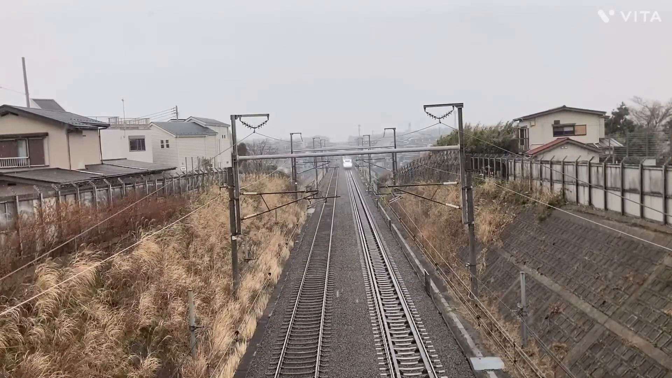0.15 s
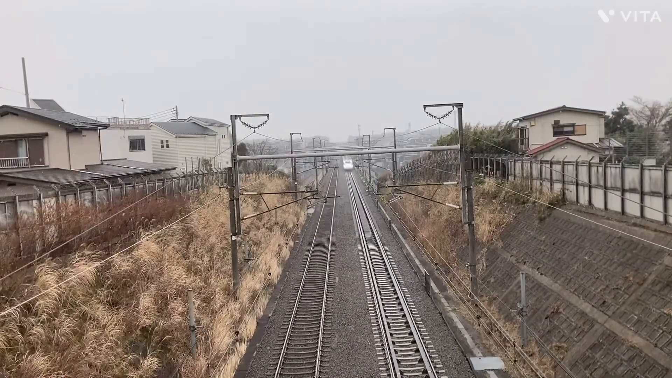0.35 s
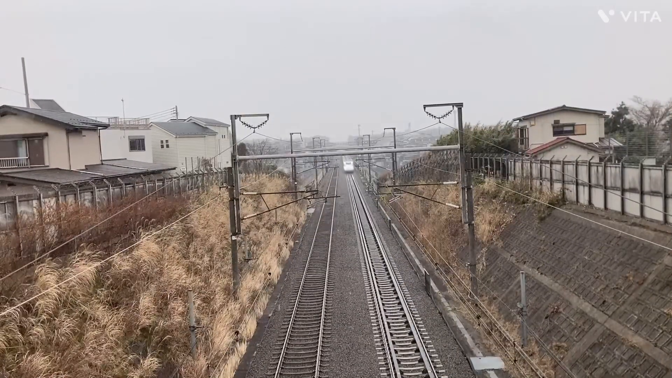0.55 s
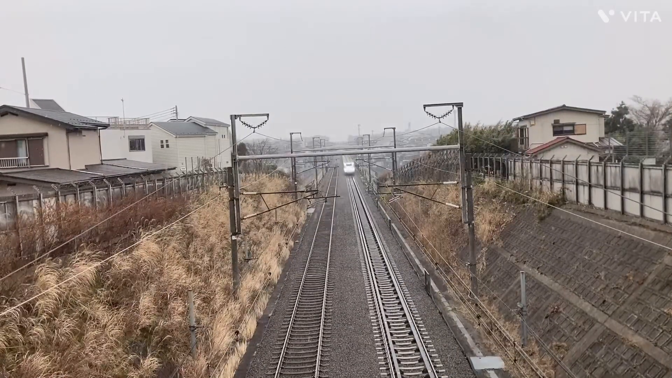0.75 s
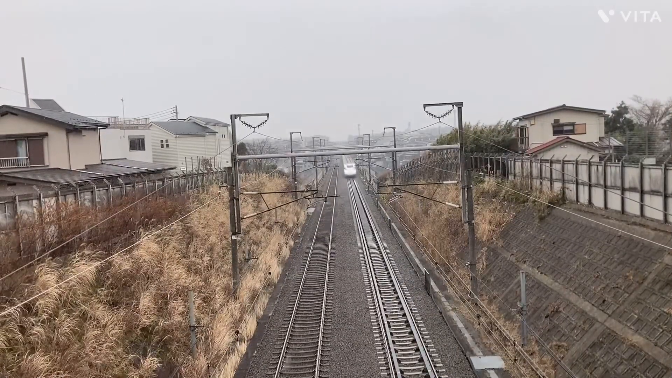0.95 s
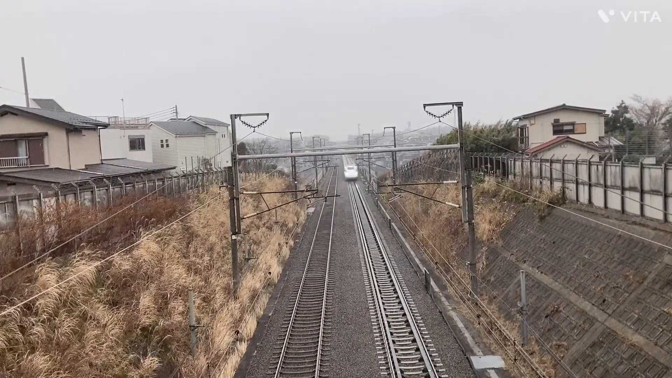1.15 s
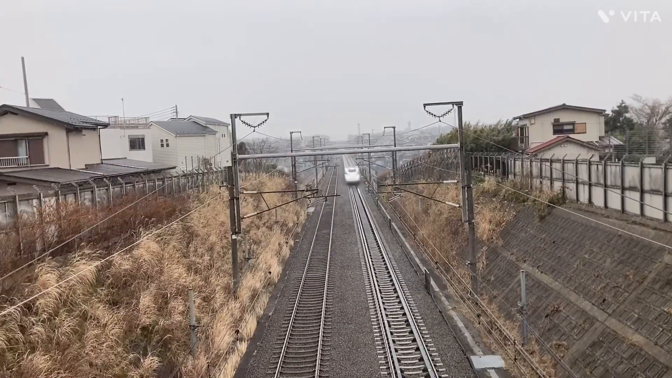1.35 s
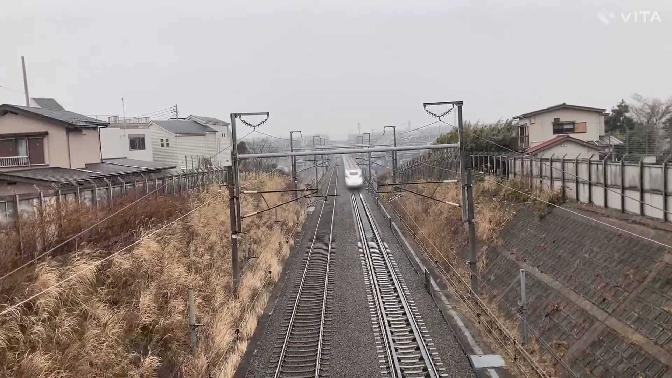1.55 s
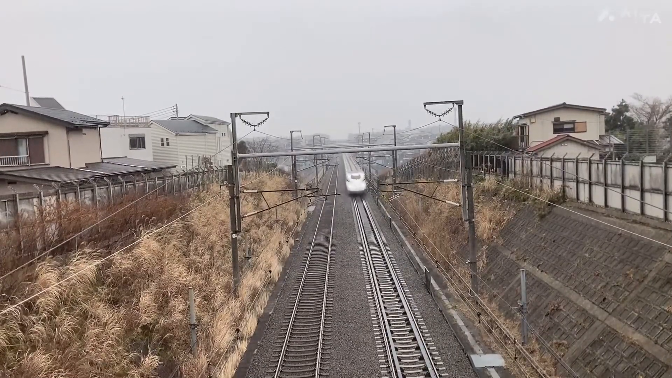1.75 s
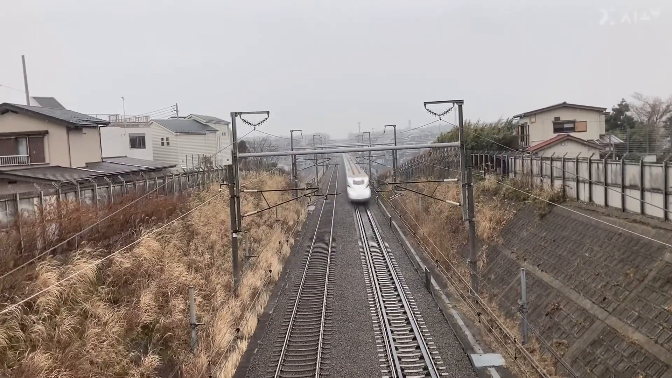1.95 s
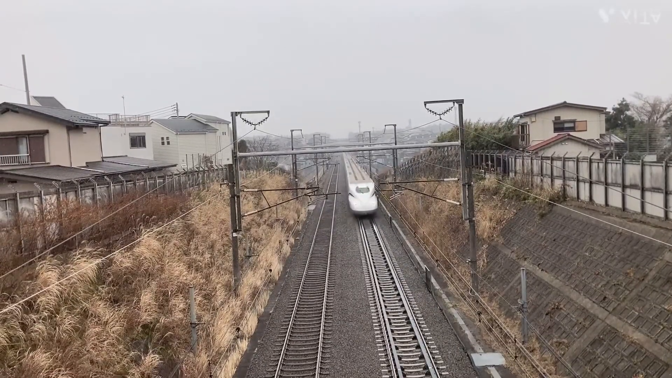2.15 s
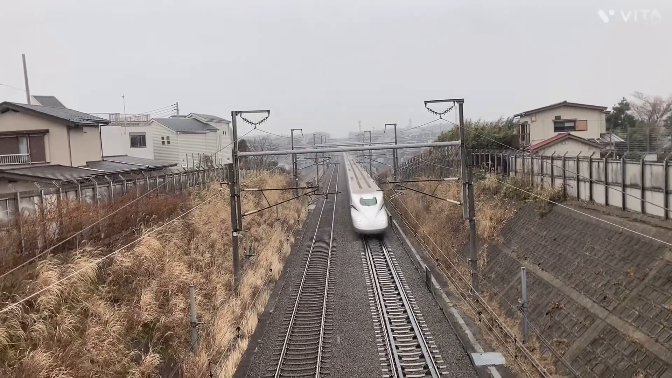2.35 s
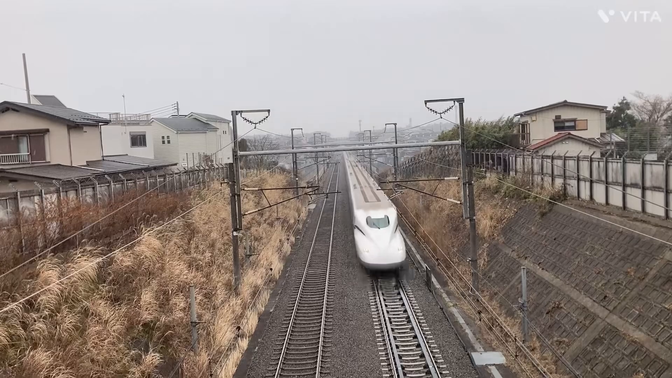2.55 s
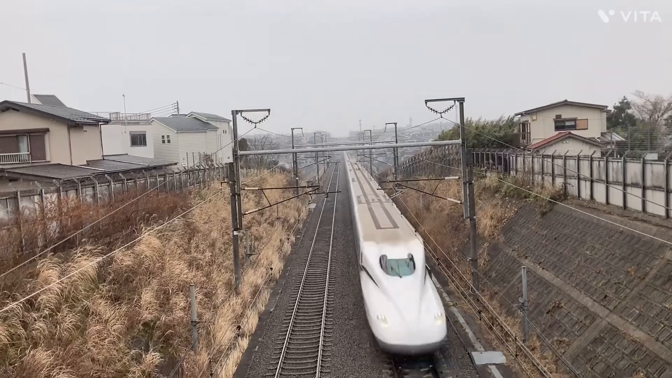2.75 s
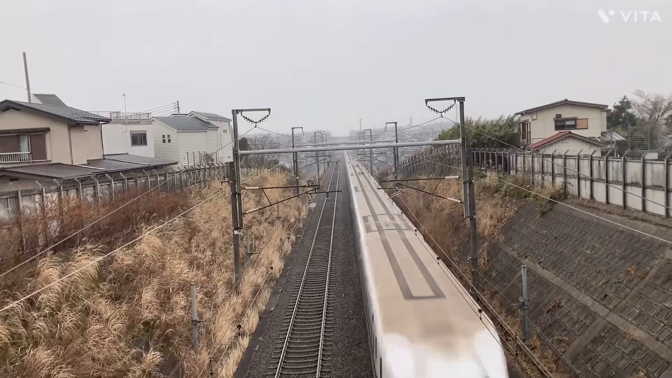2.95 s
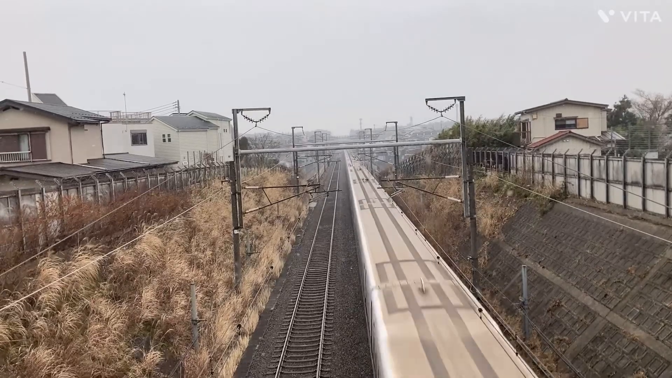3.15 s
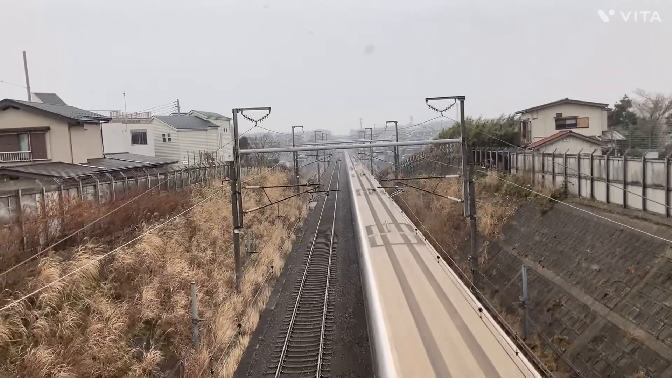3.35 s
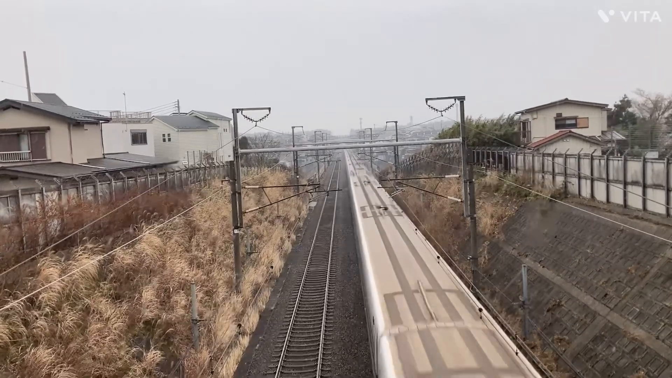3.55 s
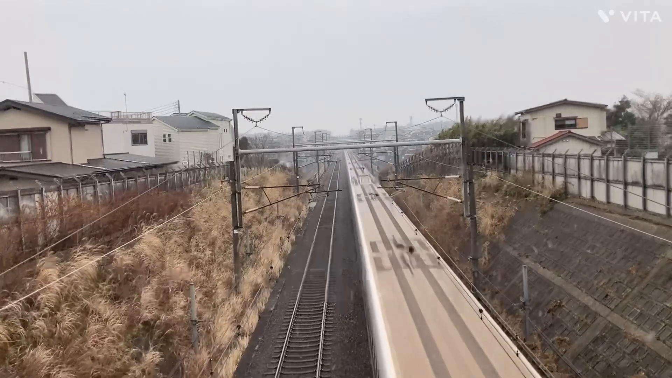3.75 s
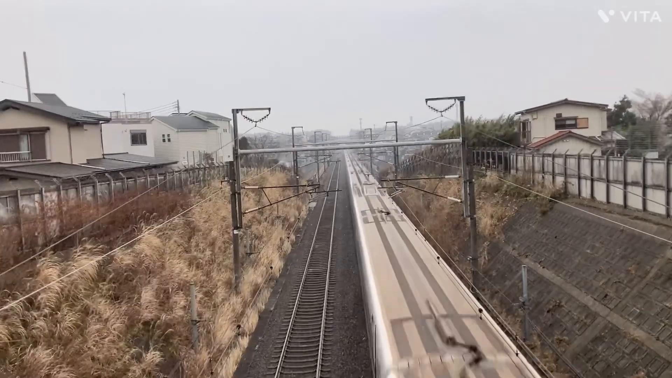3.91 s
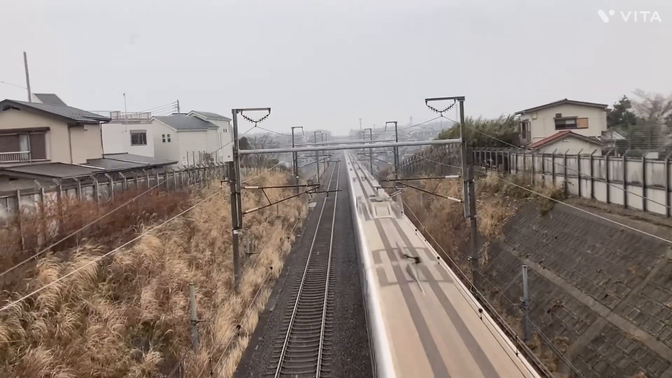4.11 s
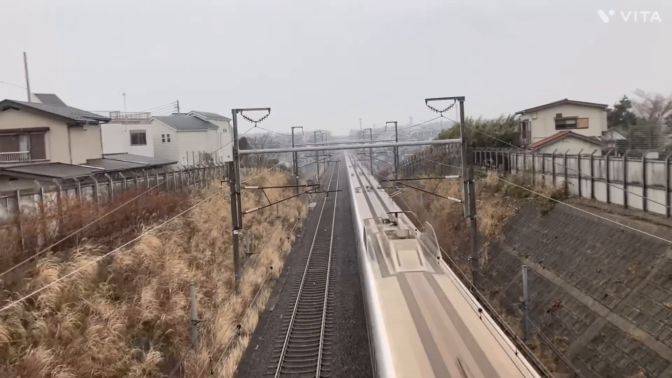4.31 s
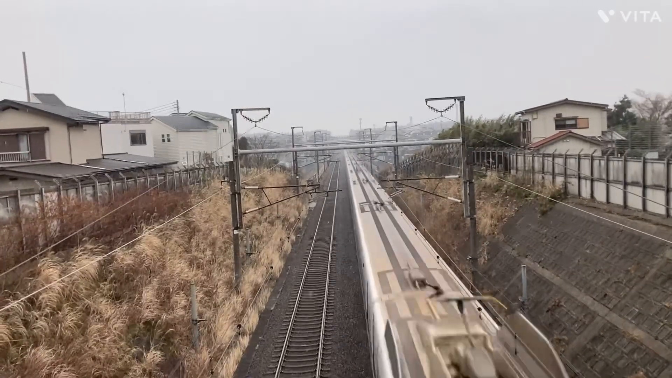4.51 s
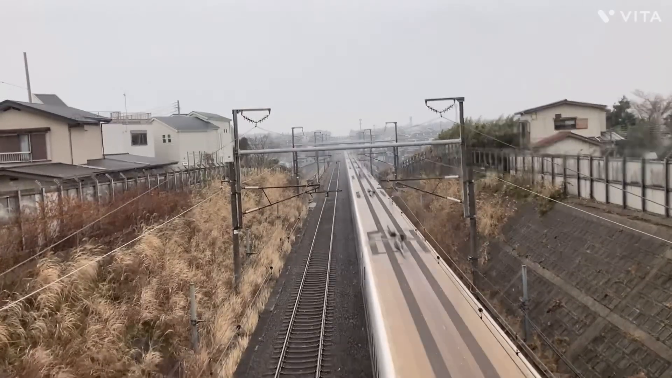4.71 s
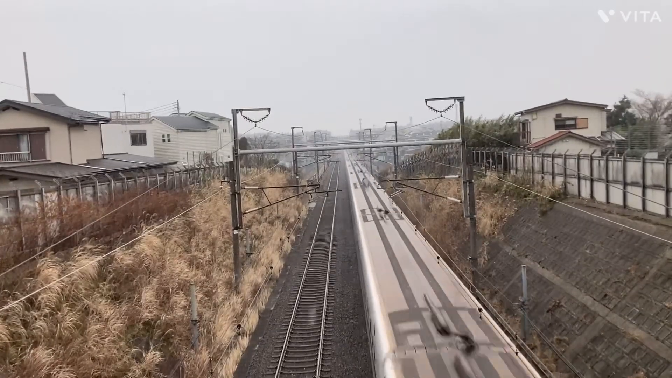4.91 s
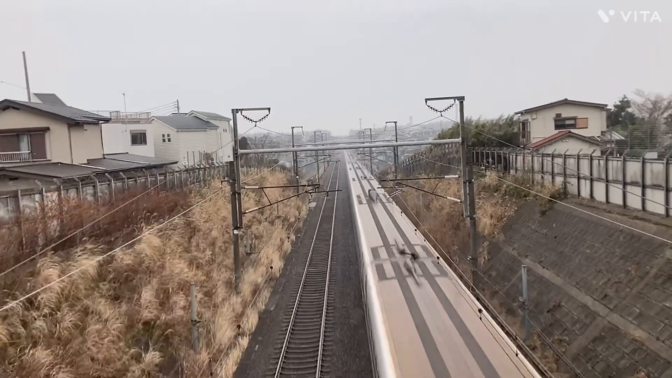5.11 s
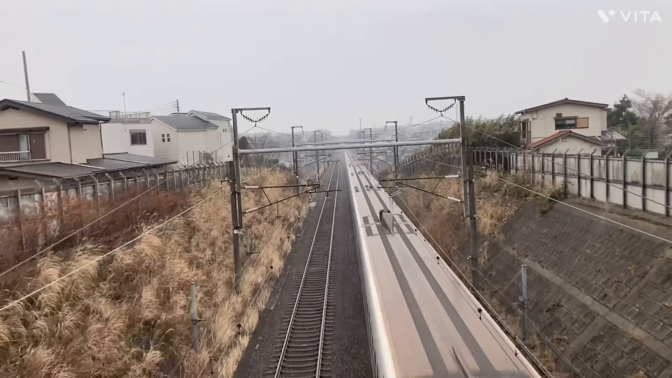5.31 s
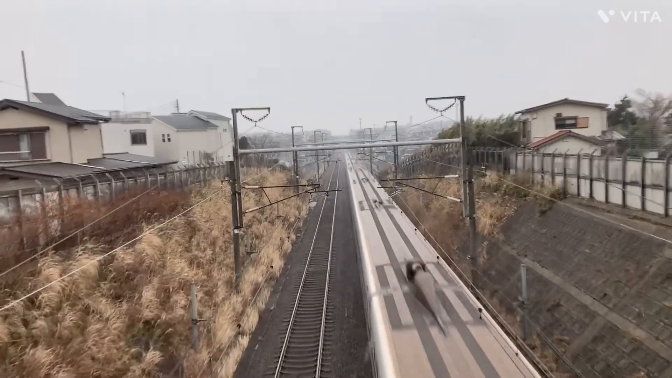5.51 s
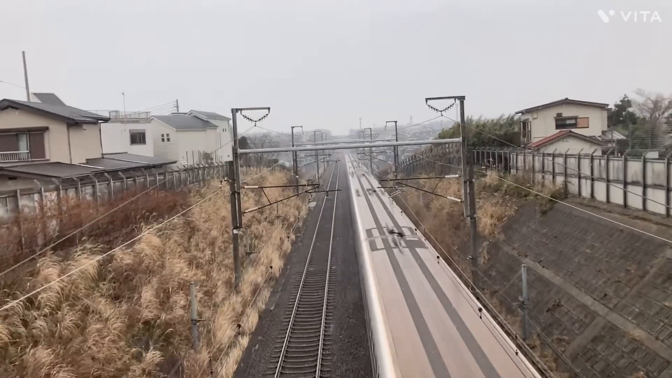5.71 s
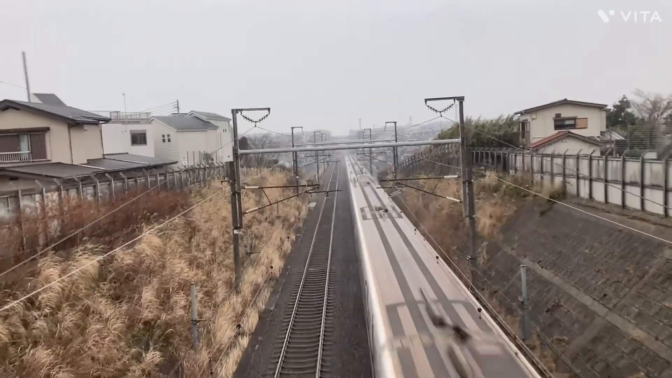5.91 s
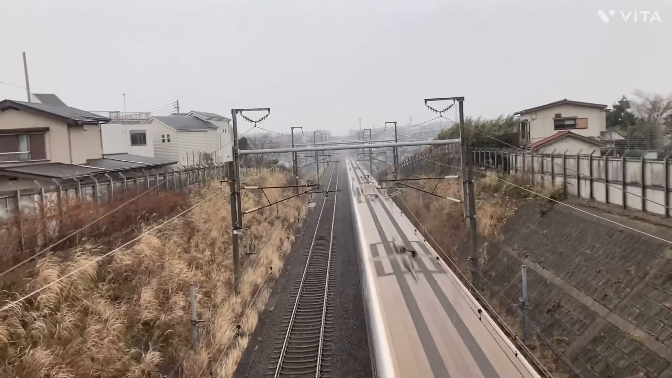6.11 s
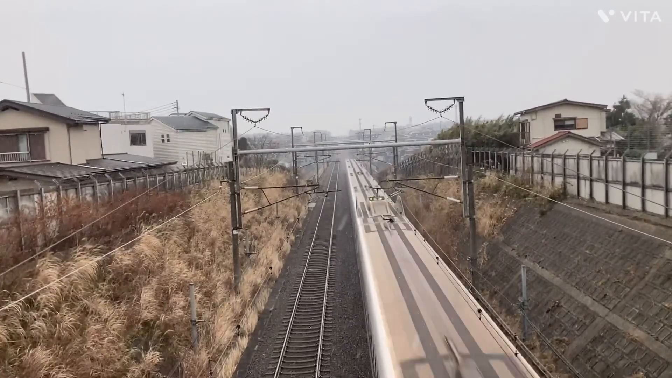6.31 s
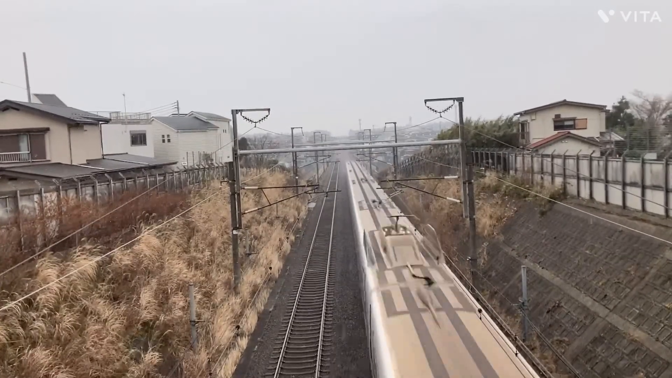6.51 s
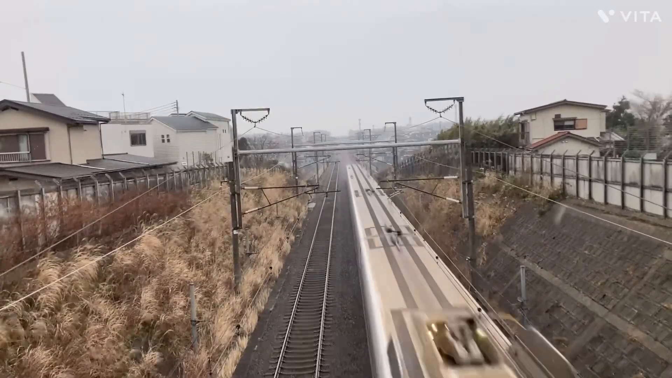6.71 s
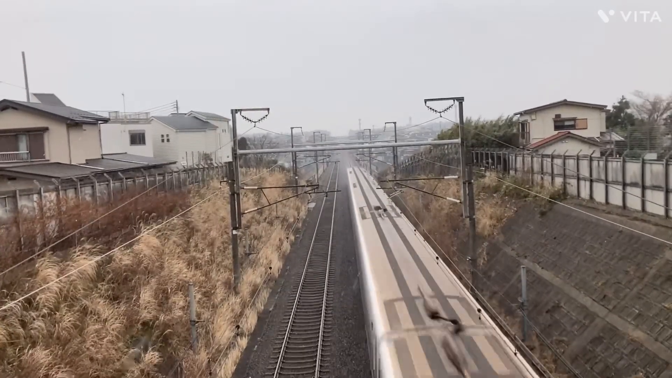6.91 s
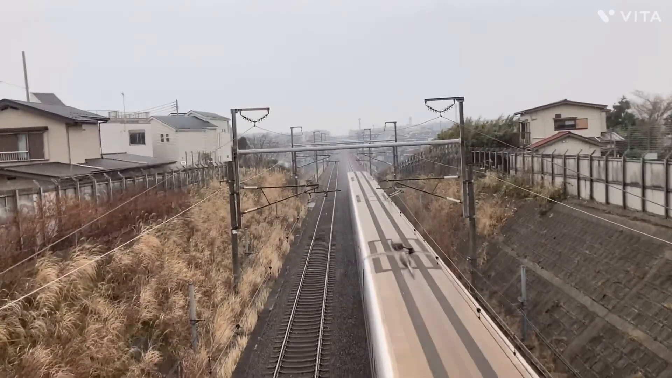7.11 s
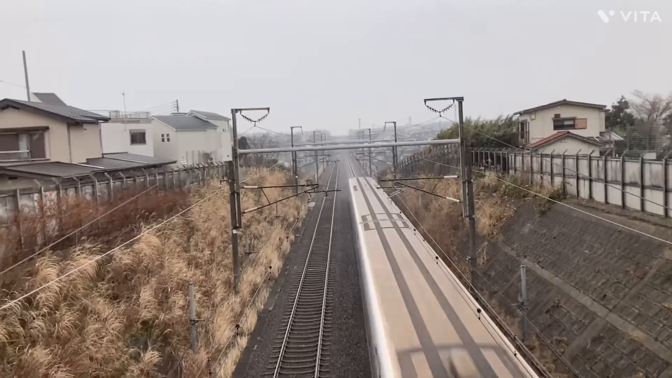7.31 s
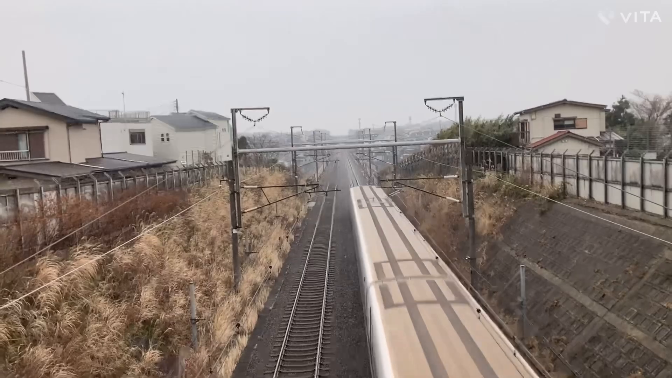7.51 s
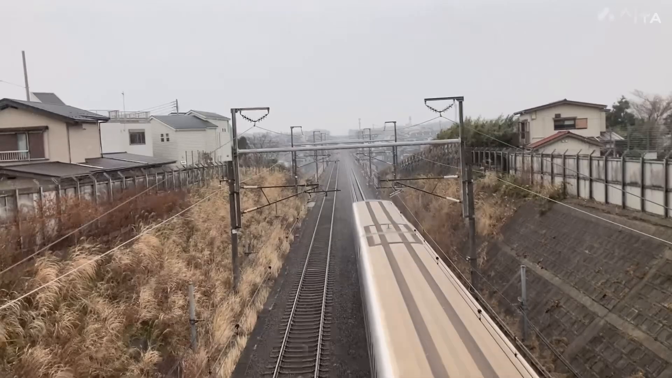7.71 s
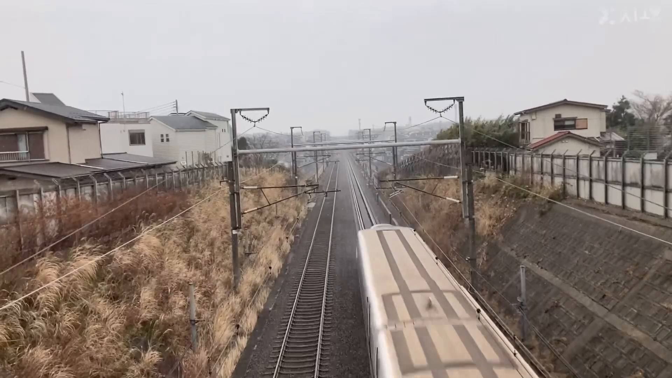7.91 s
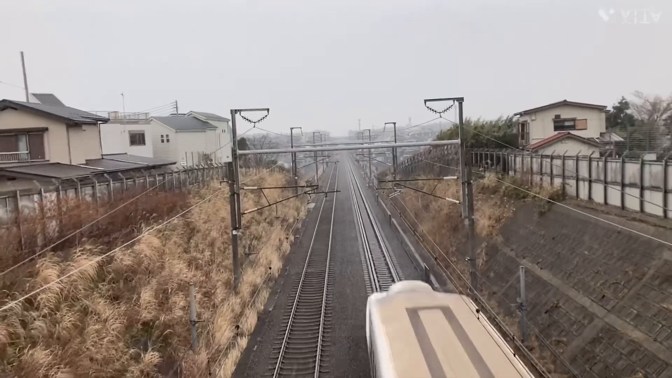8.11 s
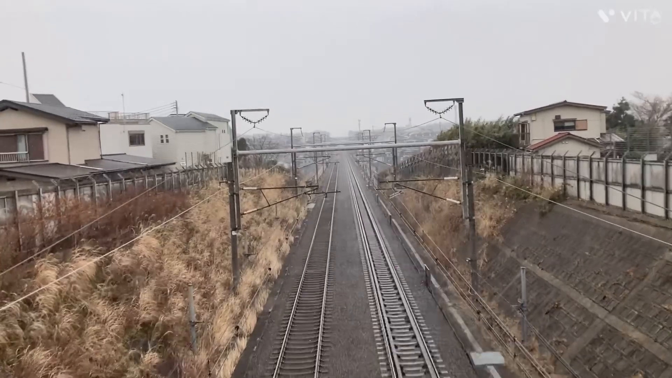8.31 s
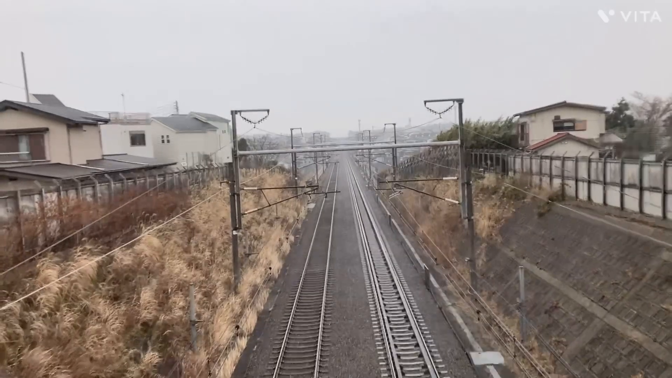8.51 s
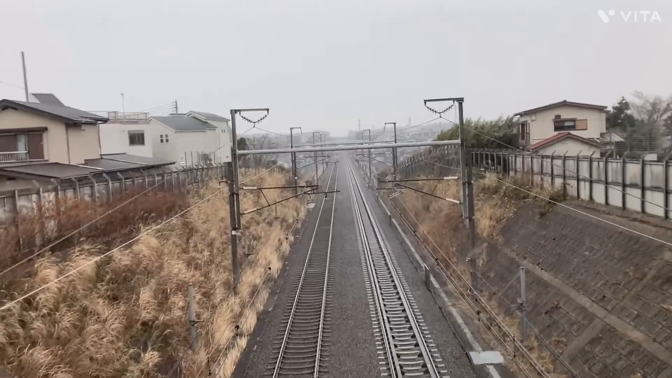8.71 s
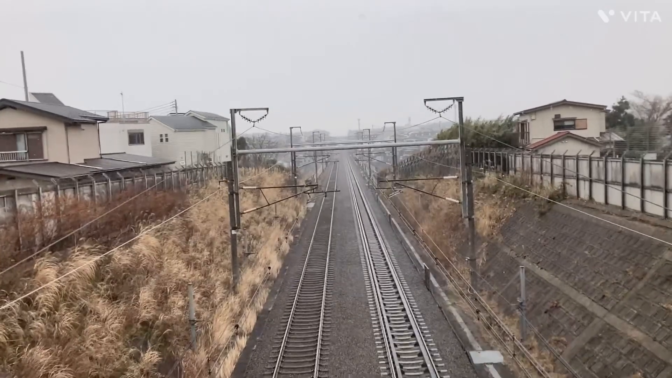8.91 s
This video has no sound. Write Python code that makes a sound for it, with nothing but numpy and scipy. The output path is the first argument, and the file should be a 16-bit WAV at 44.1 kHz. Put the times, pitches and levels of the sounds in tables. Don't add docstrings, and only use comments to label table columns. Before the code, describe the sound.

A high-speed train approaches with ringing wires and growing rumble, roars beneath a bridge in pulsing rushes of air, then cuts away into buffeting wind.

```python
import sys
import numpy as np
from scipy import signal
from scipy.fft import rfft, irfft, next_fast_len
from scipy.io import wavfile
from scipy.ndimage import uniform_filter1d

SR = 44100
rng = np.random.default_rng(int(sys.argv[2]) if len(sys.argv) > 2 else 0)


def output_pcm(signal):
    pcm = np.clip(np.atleast_2d(signal).T, -1, 1) * 32767
    wavfile.write(sys.argv[1], SR, np.round(pcm).astype(np.int16))


def attenuation_scalar(level_db):
    decades = np.asarray(level_db, float) / 20
    return 10 ** decades


N = 394694
SIZE = next_fast_len(N)
HZ = np.maximum(np.arange(SIZE // 2 + 1) * SR / SIZE, 1)
TAIL_S = 8.57

# f/Hz, density/dB per Hz
FAR_RUMBLE_DB = [(18, -35), (30, -14), (45, -1), (62, 2), (85, -5), (150, -11), (230, -14), (300, -18.5),
                 (420, -28), (550, -41)]
NEAR_RUMBLE_DB = [(18, -45), (30, -24), (40, -8.5), (52, -2.5), (74, 0.5), (110, -3.5), (200, -5.5),
                  (300, -13), (420, -24), (550, -31.5)]
FAR_ROLLING_DB = [(200, -44), (300, -4), (420, -2.5), (560, -1.5), (800, -0.5), (1000, -3), (1200, -9.5),
                  (1500, -45)]
NEAR_ROLLING_DB = [(200, -18), (300, -3), (450, -4), (650, -2), (900, -5), (1200, -10), (1500, -19)]
FAR_WHEELS_DB = [(950, -57), (1250, -9), (1500, -1), (1700, -1), (1900, -5), (2150, -10.5), (2600, -8),
                 (3300, -19)]
NEAR_WHEELS_DB = [(950, -18), (1200, -3.5), (1500, -0.5), (1900, 0.5), (2200, -3.5), (2600, -8),
                  (3300, -31.5)]
FAR_RUSH_DB = [(2100, -32), (2600, -2.5), (3300, -1), (3800, -6), (4400, -6), (5500, -12.5), (8000, -16),
               (15800, -20)]
NEAR_RUSH_DB = [(2100, -37), (2600, -1.5), (3600, -1), (5000, -6.5), (7000, -6.5), (10000, -2.5),
                (13000, -9), (15800, -5)]
# t/s, level at 15 kHz and above/dB
AIR_DULLING_DB = [(0, -9), (.8, -10), (1.5, 0.5), (8.4, 0), (8.95, -17)]
# t/s, nearness/0-1
ARRIVAL = [(2.2, 0.02), (2.902, 1)]
# t/s, nearness through air/dB, extra shaking through ground and bridge/dB
NEARNESS_DB = [(0, -28, 5), (.3, -28.5, 8), (.86, -21, -0.5), (1.13, -16, -7), (1.6, -11, -9),
               (1.85, -11.5, -2.5), (2.4, -7, 0.5), (2.85, 2.5, -2.5), (3.25, 2, 0.1), (3.6, -0.3, 2.5),
               (3.9, -1, 2), (4.3, -0.15, -0.7), (4.9, -4, 1), (5.9, -6, 3.5), (6.6, -3.5, -1),
               (7.25, -5, 2.5), (8.0, -7, 4), (8.5, -6, 3.5)]
# t/s, hiss swell/dB, thud swell/dB, half length/s
CAR_GAPS = [(3.063, 5.5, 1, 0.096), (3.39, 4, -1, 0.065), (3.732, 6, -0.5, 0.076), (4.07, 6, 1.5, 0.083),
            (4.409, 4, 3, 0.066), (5.07, 5.5, 3, 0.076), (5.415, 5.5, 3, 0.088), (5.73, 4, 1.5, 0.084),
            (6.077, 7.5, 3, 0.084), (6.42, 4.5, 4, 0.084), (6.575, 4, -0.5, 0.017),
            (7.089, 6.5, 3.5, 0.083), (7.429, 7, 5.5, 0.087), (7.76, 5, 0.5, 0.11), (8.106, 5, 2, 0.095),
            (8.506, 0.5, 1, 0.087)]
# t/s, hiss swell/dB, thud swell/dB, rise/s, fall/s
COLLECTORS = [
    (4.68, 11, 8, 0.24, 0.08),
    (5.805, 4, 7.5, 0.046, .02),
    (6.888, 10.5, 11.5, 0.2, .045),
]
# t/s, level/dB
END_CARS_DB = [(7.5, 0), (7.65, -2.2), (8.4, -2.5), (8.5, 0)]
# level/dB, shares [dB per dB] of nearness, shaking, hiss swell, thud swell, fade past tail/dB per s
RUMBLE_LAW = (-13, 1.07, 0.72, 0.01, 0.8, 11)
ROLLING_LAW = (-24.5, 1.07, 0.14, .5, 0.8, 21)
WHEEL_LAW = (-28.5, 0.7853, -0.14, 1.17, -0.12, 26)
RUSH_LAW = (-30.5, 1.09, 0.05, 1.02, 0.13, 9)
RAIL_LAW = (-31, 0.47, 0.37, 0.7, -0.54, 36)

# f/Hz, width/Hz, level/dB
RAIL_MODES = [(1803, 36, .6), (1647, 54, -6.5), (2030, 450, -1)]
# t/s, level/dB
RAIL_SONG_DB = [(1.6, -26), (2.7, -1), (3.1, -0.5), (4.1, -1), (4.8, -3), (6.6, -0.5), (7.8, -2.5),
                (8.3, -0.5), (8.62, -4), (8.75, -16)]
# t/s, f/Hz, width/Hz, length/s, level/dB
HOWLS = [(5.715, 1330, 520, 0.04, -20.5), (6.06, 3100, 1300, 0.036, -27), (4.66, 1300, 360, 0.065, -24),
         (6.86, 1450, 300, 0.046, -22), (5.39, 2900, 1600, 0.06, -29), (7.41, 3000, 1600, .06, -31),
         (4.05, 2800, 1600, .05, -28), (3.07, 2000, 600, 0.05, -24), (6.76, 7000, 2500, .1, -33),
         (3.02, 264, 95, 0.16, -19), (6.88, 280, 90, 0.06, -16), (4.8, 120, 50, 0.13, -24)]
# t/s, f/Hz, level/dB
WHISTLE = [(3.93, 6200, -60), (4.04, 6210, -38), (4.19, 6260, -36), (4.27, 6310, -27), (4.55, 6290, -28),
           (4.61, 6160, -36), (4.65, 6150, -25), (4.7, 5750, -35), (4.745, 5200, -60)]
# t/s, level/dB, decay/s
WAKE_GUSTS = [
    (8.692, -15.5, 0.016),
    (8.72, -15, 0.022),
    (8.742, -18.5, 0.018),
    (8.76, -17.5, 0.014),
    (8.775, -16.5, 0.013),
    (8.789, -12.5, 0.011),
    (8.802, -14.5, 0.014),
    (8.825, -31, 0.059),
]
# f/Hz, density/dB per Hz
WAKE_COLOUR_DB = [(120, -3), (220, 7), (500, 1), (900, -8), (1400, -16), (2000, -22), (3200, -53.5)]
# t/s, level/dB
WIRE_DB = [(0, -53), (.5, -51.5), (1, -50.5), (1.5, -47.5), (2, -41.5), (2.5, -36), (2.9, -49), (3.3, -70),
           (8.5, -66), (8.56, -37.5), (8.8, -43), (8.95, -41)]
# f/Hz, width/Hz, level/dB
WIRE_AHEAD_MODES = [(10230, 60, 6), (10750, 250, -6), (12620, 380, 5), (14450, 600, 8), (14000, 3000, 8)]
WIRE_BEHIND_MODES = [(10150, 330, 2), (12200, 400, 0), (10700, 1900, -1), (14000, 3500, 3)]

# f/Hz, left-right likeness/0-1
FAR_LIKENESS = [(60, 0.98), (330, 0.96), (700, 0.72), (1750, 0.99), (2700, 0.66), (4300, .83), (5500, 0.44),
                (6000, 0.63)]
NEAR_LIKENESS = [(60, .965), (140, .955), (330, .89), (700, .62), (1750, .45), (3300, .2), (5000, .3),
                 (6000, .45)]
TOP_LIKENESS = [(6400, .94), (16000, .945)]
# f/Hz, left lag/half turns
FAR_LAG_HALF_TURNS = [(0, 0), (700, -.06), (1750, -.03), (2300, -.33), (2800, -.4), (3800, -.1),
                      (4800, -.1), (5800, -.36), (6400, 0)]
NEAR_LAG_HALF_TURNS = [(0, 0), (170, .05), (700, .12), (1720, .4), (2300, .18), (4300, .22), (5300, 1.1),
                       (5900, 1.45), (6400, 2)]
TOP_LAG_HALF_TURNS = [(5900, 0), (6400, -.16), (7500, .14), (8350, .72), (8700, .9), (9650, 1.1),
                      (10700, 1.8), (11900, 2.16), (13150, 2.88), (14100, 3.12), (15200, 3.86), (16000, 4)]
# f/Hz, left minus right/dB
BALANCE_DB = [(60, -1), (180, 1.5), (550, -1.5), (1650, .5), (3500, 2.5), (5600, 1)]


def train(swell_db):
    rumble = patchy(colour(FAR_RUMBLE_DB), colour(NEAR_RUMBLE_DB), 24.25, 420, patchy_db=1.5, rate_hz=5.9)
    rolling = patchy(colour(FAR_ROLLING_DB), colour(NEAR_ROLLING_DB), 208, 1500,
                     patchy_db=1.63, rate_hz=13.5)
    wheels = patchy(colour(FAR_WHEELS_DB), colour(NEAR_WHEELS_DB), 890, 3300, patchy_db=1.0, rate_hz=16.0)
    rush = patchy(colour(FAR_RUSH_DB), colour(NEAR_RUSH_DB), 2130, 16000,
                  patchy_db=0.9, rate_hz=17.6, top_db=in_time(AIR_DULLING_DB)[0])
    near_rush_db = 4.2 * in_time(ARRIVAL)[0]
    out = loudness(RUMBLE_LAW, swell_db) * rumble
    out = out + attenuation_scalar(in_time(END_CARS_DB)[0]) * loudness(ROLLING_LAW, swell_db) * rolling
    out = out + loudness(WHEEL_LAW, swell_db) * wheels
    return out + attenuation_scalar(near_rush_db) * loudness(RUSH_LAW, swell_db) * rush


def swells():
    shadow_db, shadow_s = 5.5, 0.03
    t = np.arange(N) / SR
    out = np.outer([-shadow_db, 0], np.clip((t - TAIL_S) / shadow_s, 0, 1))
    for start_s, hiss_db, thud_db, half_s in CAR_GAPS:
        out = out + np.outer([hiss_db, thud_db], np.exp(-((t - start_s) / half_s) ** 2))
    for peak_s, hiss_db, thud_db, rise_s, fall_s in COLLECTORS:
        rise = np.exp(np.minimum(t - peak_s, 0) / rise_s)
        fall = np.exp(-((t - peak_s) / fall_s) ** 2)
        out = out + np.outer([hiss_db, thud_db], np.where(t < peak_s, rise, fall))
    return out


def loudness(law, swell_db):
    level_db, near, shake, hiss, thud, fade_db_per_s = law
    near_db, shake_db = in_time(NEARNESS_DB)
    gone_s = np.maximum(np.arange(N) / SR - TAIL_S, 0)
    train_db = level_db + near * near_db + shake * shake_db
    return attenuation_scalar(train_db + hiss * swell_db[0] + thud * swell_db[1] - fade_db_per_s * gone_s)


def rails(swell_db):
    wander_s, wander_hz = 0.0003, 4
    shape = resonances(RAIL_MODES)
    song = patchy(shape, shape, 1320, 2100, patchy_db=2.5, rate_hz=29.0)
    place = np.arange(N) + wander_s * SR * uniform_filter1d(drift(wander_hz), size=2000)
    song = np.array([np.interp(place, np.arange(N), side) for side in song])
    return attenuation_scalar(in_time(RAIL_SONG_DB)[0]) * loudness(RAIL_LAW, swell_db) * song


def howls():
    out, t = 0, np.arange(N) / SR
    air = two_ports(np.ones(len(HZ)), np.ones(len(HZ)))
    for peak_s, hz, width_hz, length_s, level_db in HOWLS:
        mode = rms_one(resonances([(hz, width_hz, 0)]))
        tone = irfft(air * mode, SIZE)[:, :N]
        out = out + attenuation_scalar(level_db) * tone * np.exp(-((t - peak_s) / length_s) ** 2)
    return out


def whistle():
    throb_hz, throb_db, throb_peak_s = 7.8, 3.5, 4.29
    hz, level_db = in_time(WHISTLE)
    throb = np.cos(2 * np.pi * throb_hz * (np.arange(N) / SR - throb_peak_s))
    phase = 2 * np.pi * np.cumsum(hz + 32 * drift(60) + 25 * throb) / SR
    blur = 1 + 0.5 * np.array([drift(170), drift(170)])
    sounding = level_db > -59
    flutter = attenuation_scalar(level_db + throb_db * throb + 2.2 * drift(40)) * sounding
    return flutter * blur * np.sin(phase + np.array([[0], [-0.7]]))


def wake():
    attack_s = 0.0016
    gusts = irfft(rfft(rng.standard_normal((3, SIZE))) * colour(WAKE_COLOUR_DB), SIZE)[:, :N]
    puffs, t = 0, np.arange(N) / SR
    for start_s, level_db, decay_s in WAKE_GUSTS:
        onset = np.clip((t - start_s) / attack_s, 0, 1)
        puffs = puffs + attenuation_scalar(level_db) * onset * np.exp(-np.maximum(t - start_s, 0) / decay_s)
    return puffs * rms_one(gusts[:2] + 1.05 * gusts[2])


def wire():
    ringing = patchy(resonances(WIRE_AHEAD_MODES), resonances(WIRE_BEHIND_MODES), 8000, 16000,
                     patchy_db=-0.9, rate_hz=9.0)
    return attenuation_scalar(in_time(WIRE_DB)[0]) * ringing


def patchy(far_shape, near_shape, low_hz, high_hz, patchy_db, rate_hz, top_db=0):
    noise, shared, out = two_ports(far_shape, near_shape), drift(rate_hz), 0
    place = 2 * np.log2(HZ / low_hz)
    count = int(np.ceil(2 * np.log2(high_hz / low_hz)))
    for k in range(count + 1):
        band = np.cos(np.pi / 2 * np.clip(place - k, -1, 1)) ** 2
        swell_db = patchy_db * (0.34 * shared + drift(rate_hz))
        gain = attenuation_scalar(swell_db + top_db * min(k / 5.6, 1))
        out = out + irfft(noise * band, SIZE)[:, :N] * gain
    return out


def two_ports(far_shape, near_shape):
    near = np.clip(np.interp(np.arange(SIZE) / SR, *np.transpose(ARRIVAL)), 0, 1)
    top_lag = np.interp(HZ, *np.transpose(TOP_LAG_HALF_TURNS))
    states = ((far_shape, FAR_LIKENESS, FAR_LAG_HALF_TURNS, 1 - near),
              (near_shape, NEAR_LIKENESS, NEAR_LAG_HALF_TURNS, near))
    out = 0
    for shape, likeness, lag, share in states:
        direct, scattered = rfft(rng.standard_normal((2, SIZE))) * rms_one(shape)
        alike = np.clip(at_hz(likeness + TOP_LIKENESS), 0, 1)
        turn = np.exp(1j * np.pi * (np.interp(HZ, *np.transpose(lag)) + top_lag))
        right = turn * (alike * direct + np.sqrt(1 - alike ** 2) * scattered)
        out = out + np.sqrt(share) * irfft([direct, right], SIZE)
    tilt = attenuation_scalar(at_hz(BALANCE_DB + [(6400, 0)]) / 2)
    return rfft(out) * [tilt, 1 / tilt]


def resonances(modes):
    power = 0
    for hz, width_hz, level_db in modes:
        power = power + attenuation_scalar(2 * level_db) / width_hz / (1 + (2 * (HZ - hz) / width_hz) ** 2) ** 2
    return np.sqrt(power)


def drift(rate_hz):
    pole = np.exp(-2 * np.pi * rate_hz * 40 / SR)
    noise = rng.standard_normal(N // 40 + 2002)
    slow = signal.lfilter([1], [1, -2 * pole, pole * pole], noise)[2000:]
    return np.interp(np.arange(N) / 40, np.arange(len(slow)), rms_one(slow))


def colour(points):
    return attenuation_scalar(at_hz(points))


def at_hz(points):
    hz, value = np.transpose(points)
    return np.interp(np.log(HZ), np.log(hz), value)


def in_time(rows):
    s, *columns = np.transpose(rows)
    return [np.interp(np.arange(N) / SR, s, column) for column in columns]


def rms_one(x):
    return x / np.sqrt(np.mean(x ** 2) + 1e-20)


def scene():
    swell_db = swells()
    return train(swell_db) + rails(swell_db) + howls() + whistle() + wake() + wire()


def band_limit(x):
    return signal.sosfilt(signal.butter(12, 17070, fs=SR, output="sos"), x)


def record(dry):
    rounded = 1.05 * np.tanh(dry / 1.05)
    low_pass = signal.ellip(14, 0.5, 75, 15730, fs=SR, output="sos")
    mix = signal.sosfilt(low_pass, rounded)
    return band_limit(mix)


dry = scene()
out = record(dry)
output_pcm(out)
```